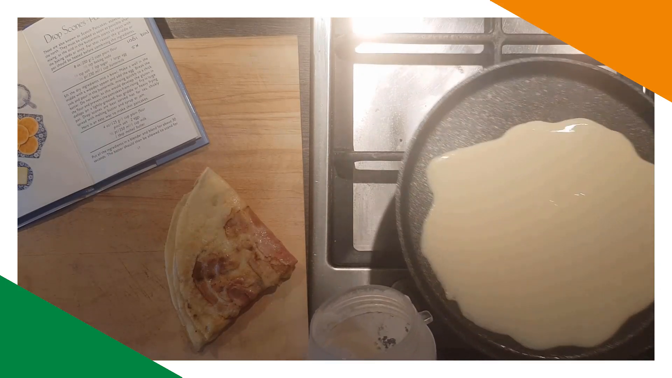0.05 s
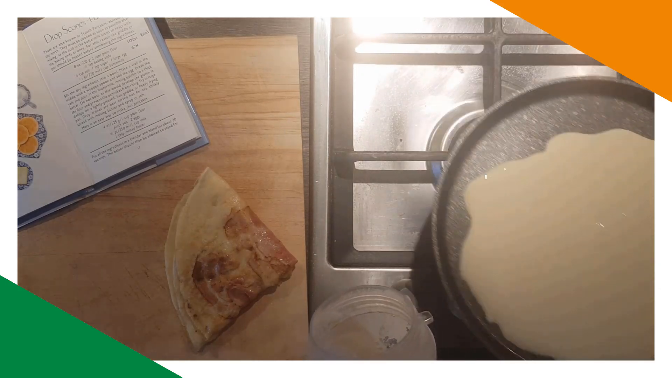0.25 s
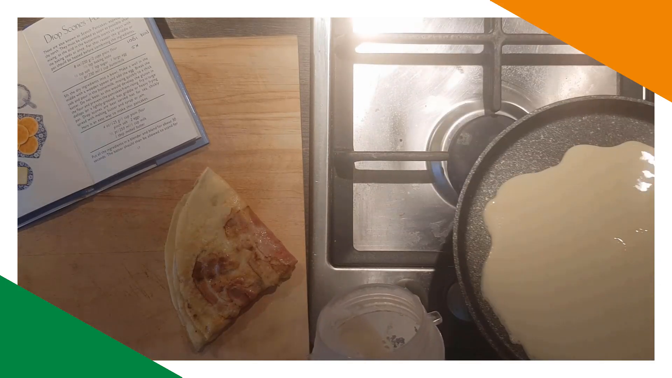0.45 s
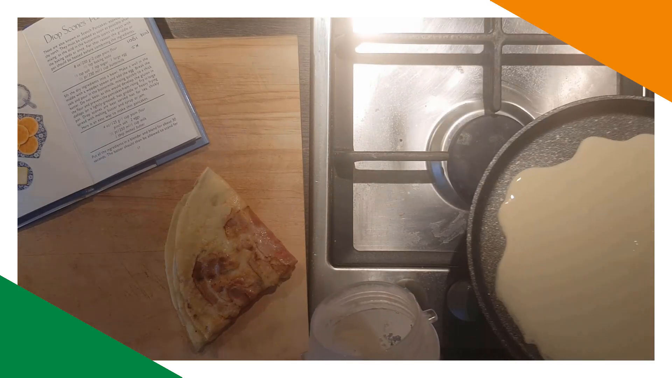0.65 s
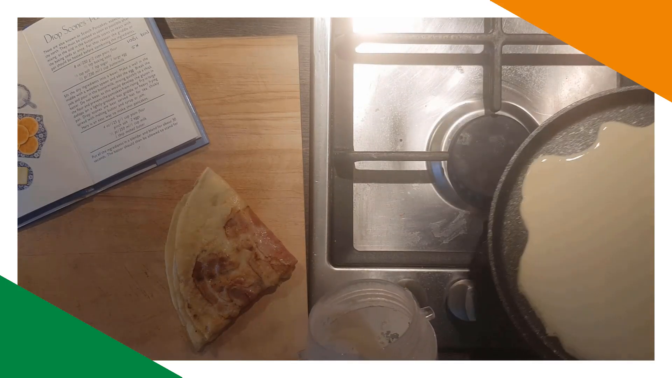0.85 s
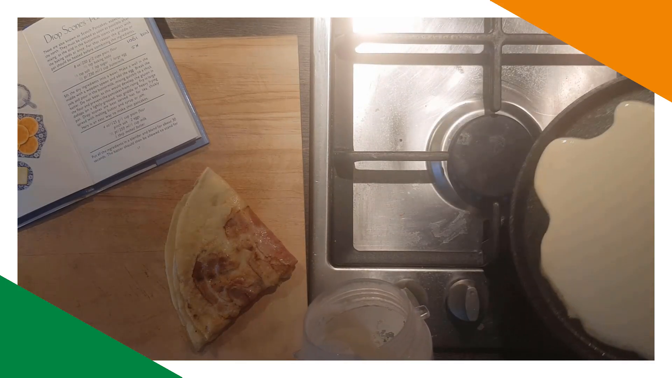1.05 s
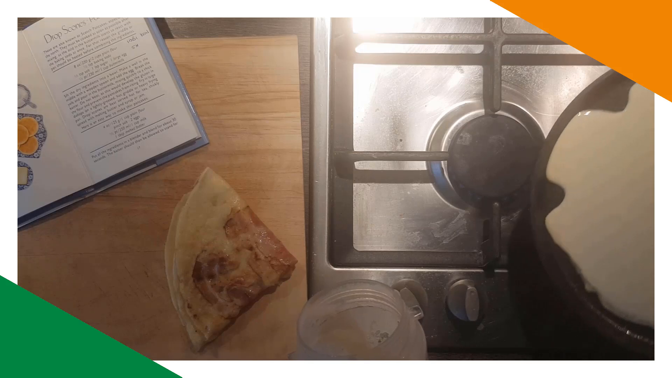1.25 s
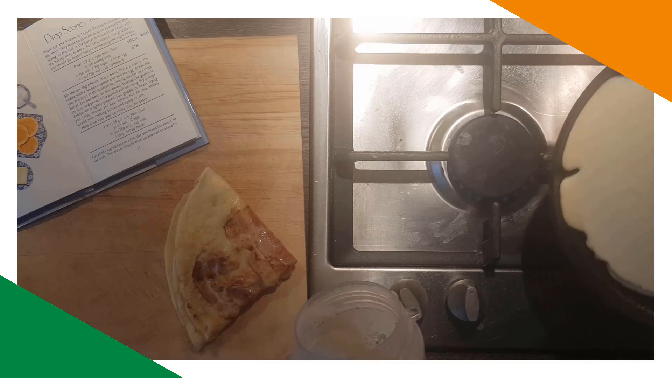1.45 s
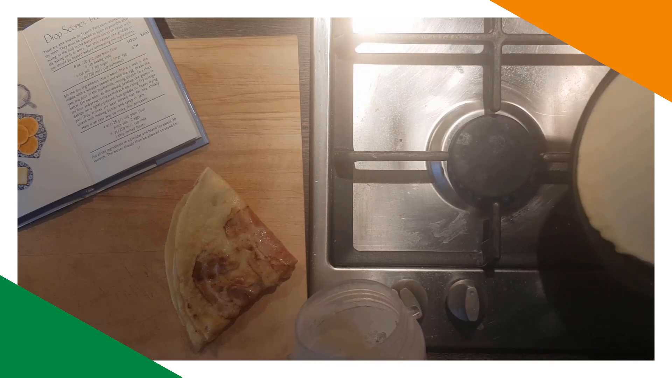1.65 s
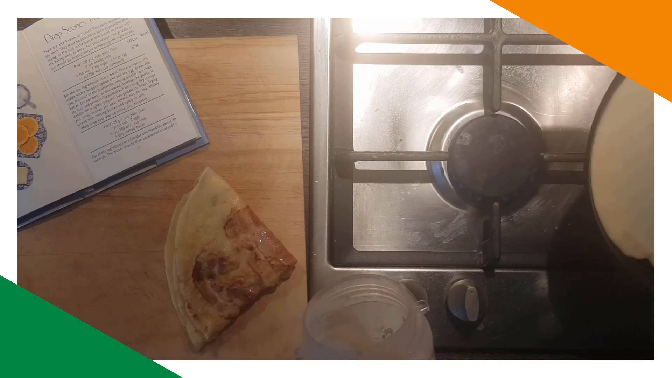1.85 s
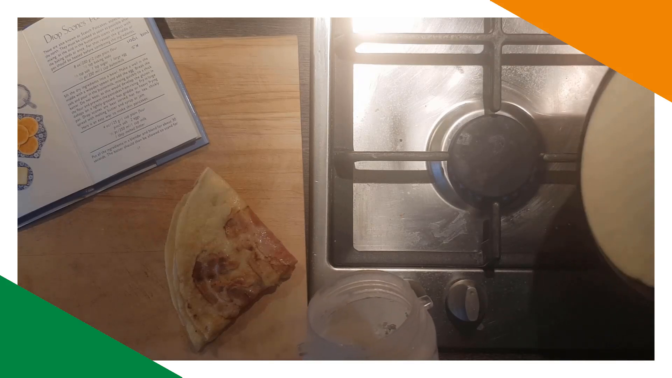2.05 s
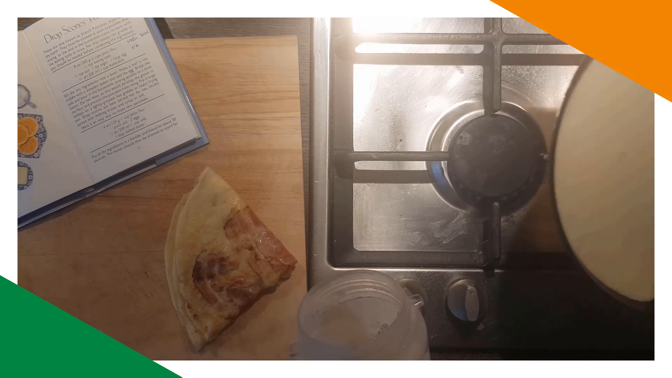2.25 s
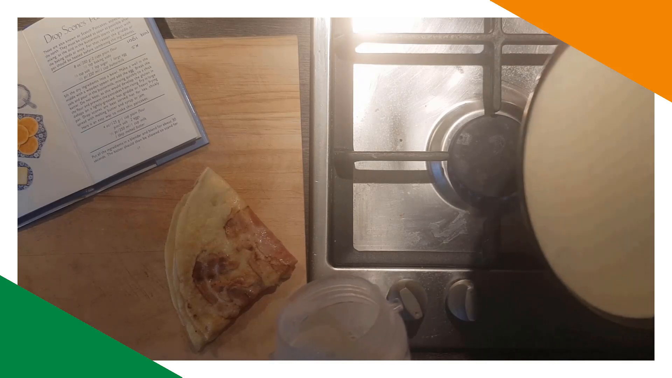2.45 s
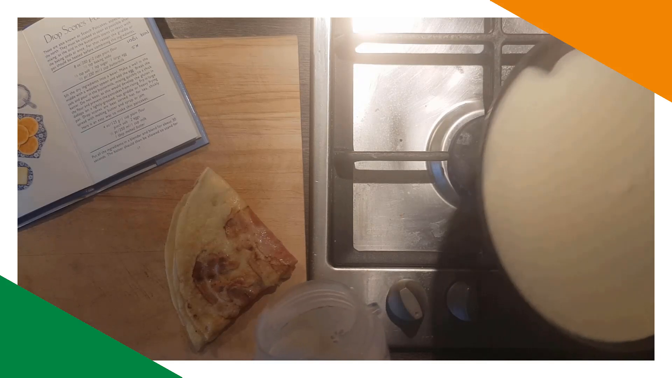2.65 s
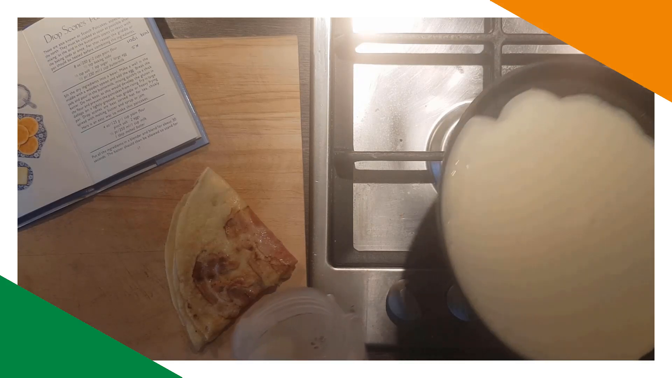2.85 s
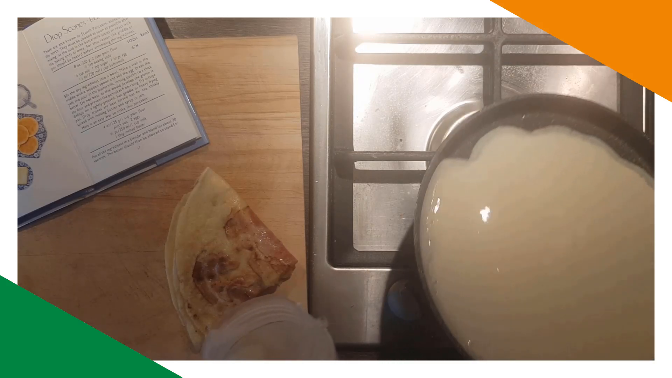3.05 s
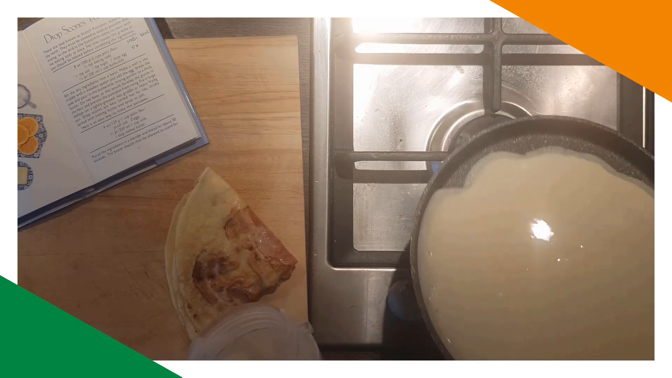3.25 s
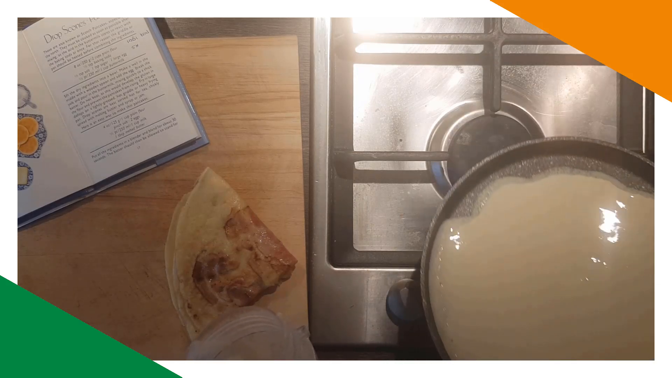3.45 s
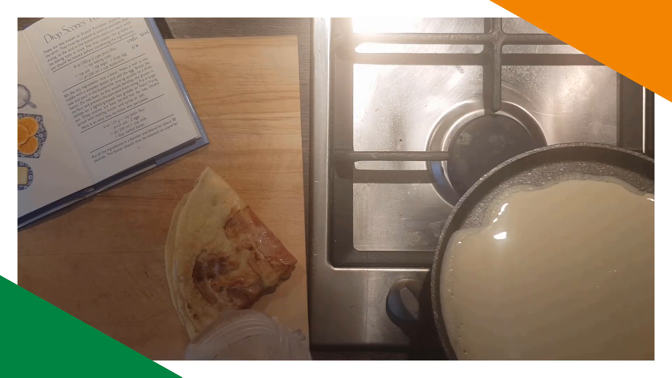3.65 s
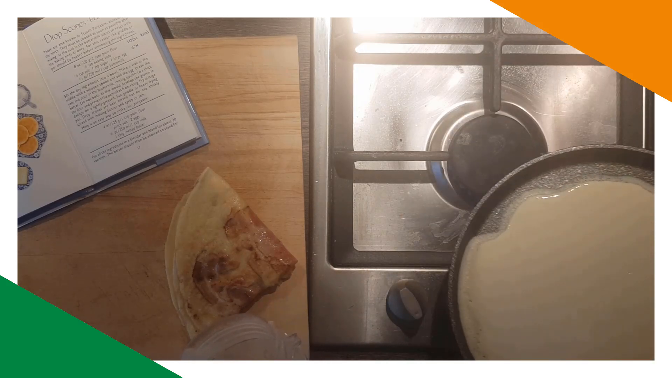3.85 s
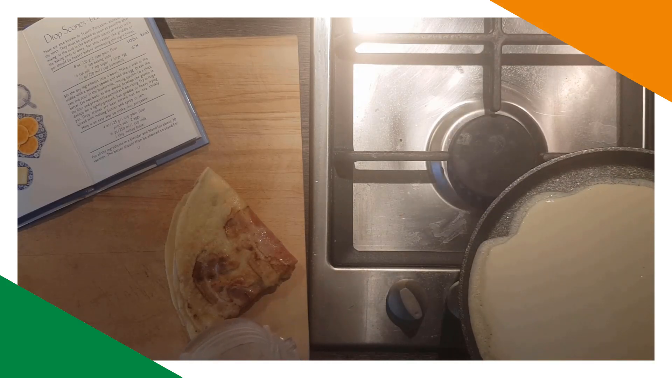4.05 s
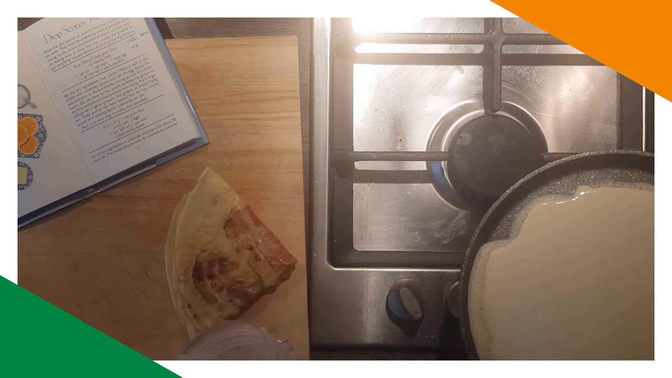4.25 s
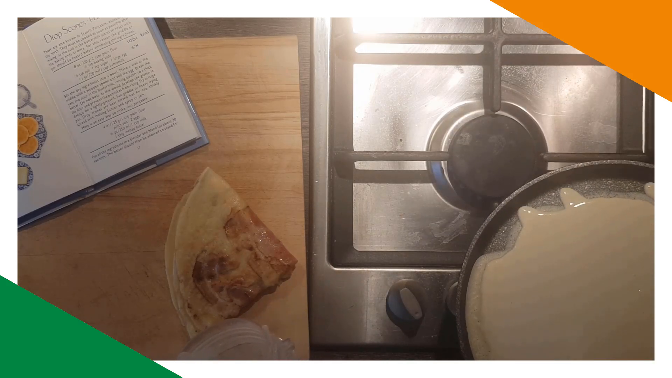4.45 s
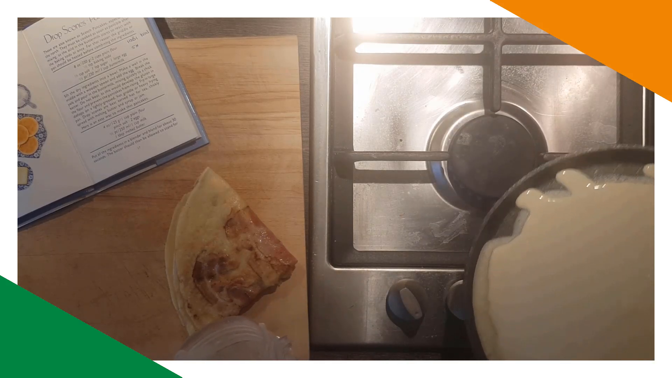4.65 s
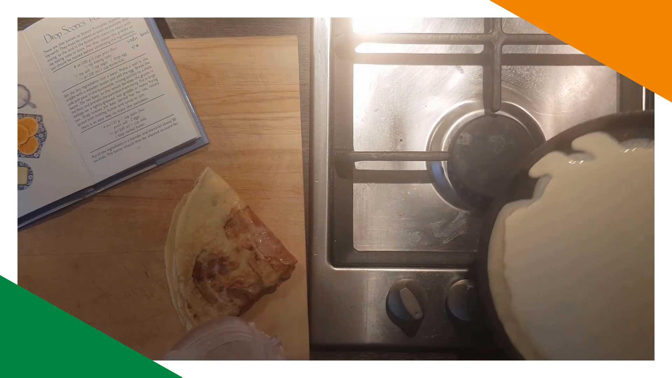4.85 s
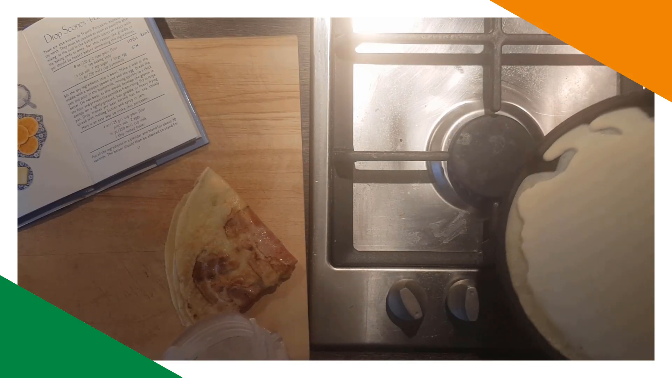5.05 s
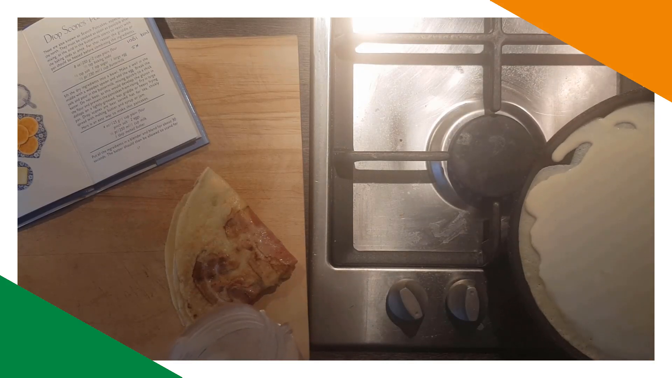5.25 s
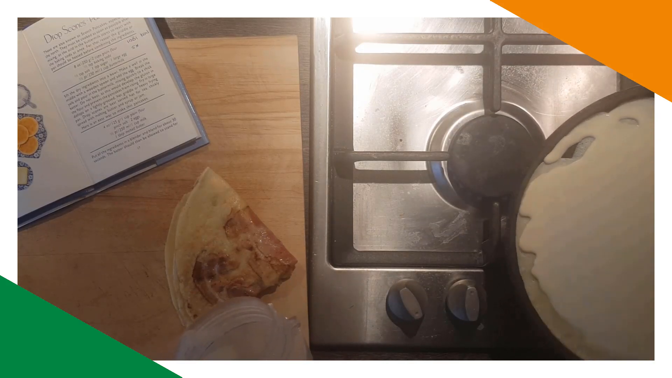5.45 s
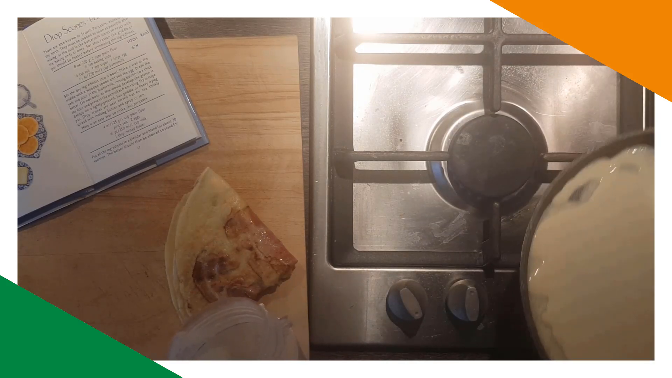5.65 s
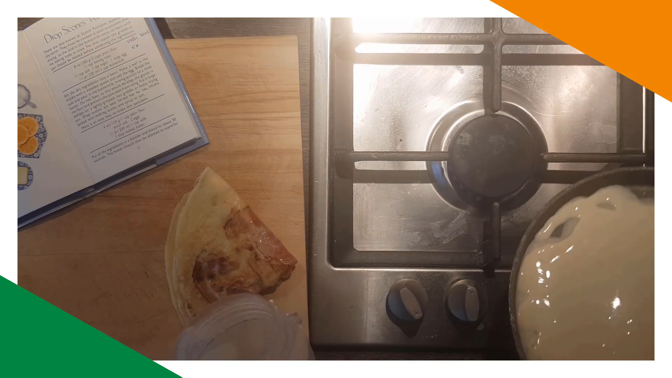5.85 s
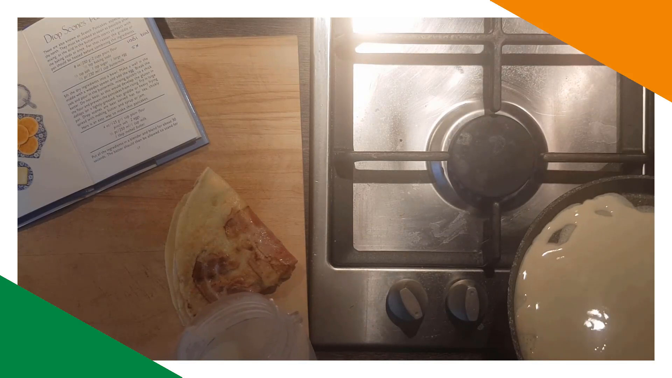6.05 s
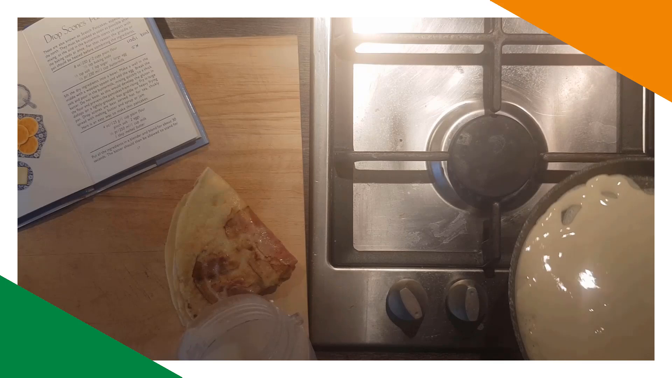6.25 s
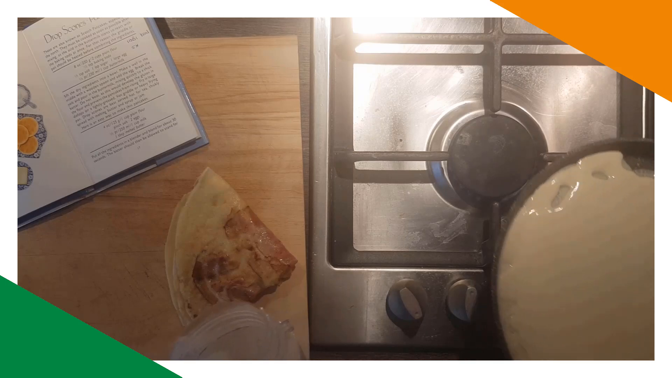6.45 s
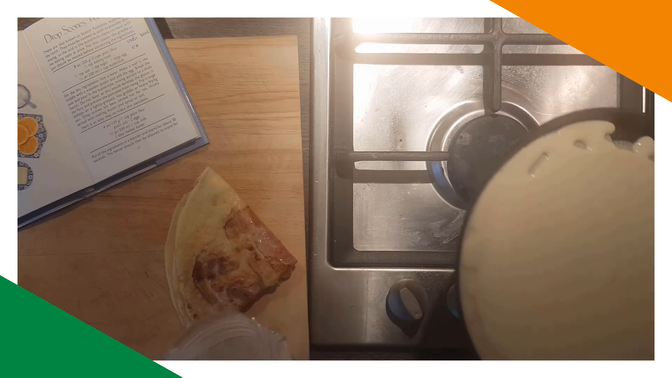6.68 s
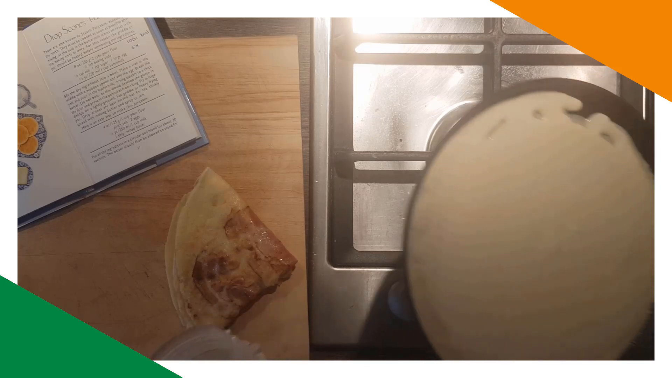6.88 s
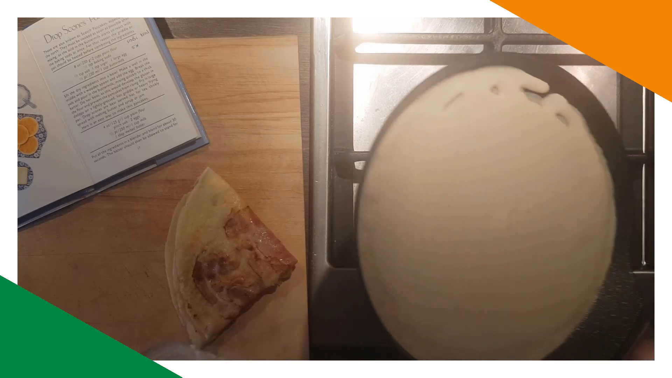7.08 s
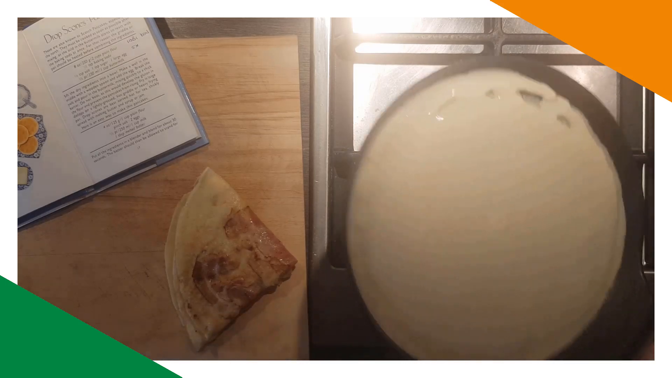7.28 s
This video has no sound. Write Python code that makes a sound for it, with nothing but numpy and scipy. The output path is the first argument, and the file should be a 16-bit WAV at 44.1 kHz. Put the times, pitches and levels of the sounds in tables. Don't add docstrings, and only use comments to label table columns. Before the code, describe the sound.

Bright close frying hiss with crackling pops flares for three seconds, then sinks to sparse sputters above quiet, dull mechanical patter and low rumble.

```python
import sys
import numpy as np
from scipy import signal
from scipy.fft import rfft, irfft, next_fast_len
from scipy.io import wavfile
from scipy.ndimage import uniform_filter1d

SR = 44100
rng = np.random.default_rng(int(sys.argv[2]) if len(sys.argv) > 2 else 0)


def store_wav(level_fs):
    pcm = np.round(np.clip(np.atleast_2d(level_fs), -1, 1) * 32767)
    wavfile.write(sys.argv[1], SR, pcm.T.astype(np.int16))


def amplitude_ratio(level_db):
    exponent = np.asarray(level_db, float) / 20
    return 10 ** exponent


N = 322812

# pitch_hz, density_db
ROOM_SPECTRUM = [(12, -29), (20, 3.5), (48, -3.5), (129, -4), (229, -11), (367, -9.5), (517, -19),
                 (586, -13), (742, -20.5), (1500, -22), (1950, -63), (3300, -120)]

# start_s, level_db
THUMP_TRAINS = [
    [(0.067, -45), (0.138, -48), (0.283, -45), (0.353, -48), (0.423, -45), (0.49, -42), (0.558, -49),
     (0.689, -50), (0.763, -47), (1.101, -46), (1.167, -50), (1.367, -45), (1.504, -49)],
    [(0.997, -51), (1.213, -48), (1.35, -48), (1.634, -46), (1.702, -46), (1.775, -43), (1.841, -44),
     (1.911, -50), (2.119, -45), (2.191, -47), (2.258, -46), (2.329, -44), (2.465, -47), (2.61, -45),
     (3.027, -49), (3.248, -45), (3.386, -50)],
    [(3.69, -46), (3.912, -49), (3.989, -48), (4.054, -53), (4.26, -51), (4.333, -49), (4.611, -53)],
    [(4.752, -49), (4.968, -47), (5.037, -45)],
    [(4.59, -53), (4.737, -47), (4.884, -51), (5.029, -47), (5.105, -48), (5.378, -47), (5.523, -46),
     (5.595, -52), (5.671, -47), (5.871, -47), (6.009, -47), (6.078, -53), (6.143, -49), (6.283, -46),
     (6.353, -50), (6.488, -50), (6.698, -48), (7.043, -48), (7.116, -46)],
    [(0.276, -45), (0.344, -52), (0.415, -46)],
    [(6.058, -47), (6.203, -48)],
    [(6.438, -51), (6.513, -46), (6.663, -50), (6.741, -46), (6.812, -46), (6.96, -46), (7.311, -48)],
    [(7.051, -48), (7.125, -46), (7.199, -52), (7.274, -45)],
]
# start_s, level_db
MAIN_THUMP_TRAIN = [(0.701, -49), (0.774, -50), (0.907, -47), (1.404, -46), (1.545, -49), (1.615, -44),
                    (1.755, -45), (1.824, -48), (1.892, -44), (2.297, -47), (2.717, -48), (2.786, -44),
                    (2.858, -47), (2.929, -44), (3.064, -52), (3.131, -45), (3.323, -45), (3.461, -45),
                    (3.66, -45), (3.73, -48), (3.804, -47), (4.02, -44), (4.301, -45), (4.366, -41),
                    (4.437, -47), (4.509, -45), (4.646, -45), (4.98, -45), (5.32, -45), (5.452, -47),
                    (5.643, -47), (5.911, -46), (5.979, -45), (6.193, -46), (6.461, -47), (6.532, -54),
                    (6.67, -47)]
# start_s, level_db
LONE_KNOCKS = [(.4, -51), (0.432, -47), (1.713, -48), (1.785, -52), (1.918, -50), (1.99, -47), (2.17, -52),
               (2.318, -49), (2.6, -45), (2.756, -50), (2.813, -43), (3.33, -48), (4.291, -50),
               (4.366, -56), (4.516, -49), (5.459, -53), (5.538, -52), (6.361, -49), (7.265, -43.5)]
# pitch_hz, level_db, t60_s, left_right_db
BODY_MODES = [
    (132, -5, 0.029, -4.5),
    (353.6, 1, 0.019, -0.5),
    (60, -20, 0.0081, 0),
]

# start_s, length_s, level_db
PAN_HUMS = [
    (1.596, 0.3, -60.5),
    (1.914, 0.086, -57.5),
    (2.045, 0.23, -63.5),
    (2.287, 0.19, -62),
]
# start_s, peak_db, pitch_hz
BUBBLE_POPS = [(0.015, -34, 2480), (0.0505, -37, 2060), (0.1336, -34, 2660), (0.2024, -29, 2750),
               (0.637, -37, 2560), (0.8001, -39, 2340), (0.8345, -37, 2780), (1.1837, -42, 2610),
               (1.2266, -35, 2710), (1.4147, -32, 2360), (1.4486, -39, 2760), (1.9225, -38, 2550),
               (1.9894, -37, 2780), (2.326, -27, 1920), (2.4199, -39, 2660), (2.4453, -36, 1860),
               (2.9347, -37, 2700), (3.3653, -45, 1740), (3.397, -40, 1320), (3.4994, -42, 1850),
               (3.6072, -44, 2220), (3.8467, -37, 2490), (3.8711, -36, 1980), (3.967, -42, 1660),
               (4.1574, -40, 1660), (4.2248, -40, 2630), (4.2632, -49, 1680), (4.437, -36, 1790),
               (4.574, -34, 2420), (4.6099, -49, 1830), (4.6324, -38, 1760), (4.7656, -46, 2680),
               (4.791, -36, 2410), (4.8229, -38, 1740), (5.1517, -50, 2270), (5.2994, -43, 1670),
               (5.5927, -42, 1600), (5.8411, -40, 1870), (6.8089, -50, 1790), (6.9346, -48, 1830)]

# time_s, vigour_db (fizz level), tilt_db (towards the microphones),
# fresh_db (fresh batter on bare metal)
SWIRL = [(0, -40.5, 4, -0.5), (.08, -40.5, -4, -1.5), (.9, -45, 4, -2.5), (1.3, -39.5, -16.5, 1.5),
         (1.87, -39.5, -22, 3.5), (2.06, -37.5, -13, 3), (2.44, -41, -2.5, 1.5), (2.75, -40, -0.5, -0.5),
         (3.26, -50, 7, 0.5), (3.55, -51, -0.5, -1.5), (4.4, -55, 1, -2.5), (4.77, -53.5, -9, 0.5),
         (5.28, -55.5, -6.5, 1.5), (5.38, -56.5, -6, 1.5), (5.85, -60, 1.5, 2.5), (5.95, -66, 5, 2),
         (6.25, -63, 3.5, 2), (7.32, -63, 5, -1)]
# pitch_hz, density_db
FIZZ_SPECTRUM = [(410, -21), (700, -17.5), (944, -12), (1010, -14), (1360, -5.5), (1550, -5), (2470, -4.5),
                 (2670, -5.5), (3800, -4.5), (5130, -2.5), (7770, -3), (8970, -1), (12900, -0.5),
                 (15100, -5), (15700, -6)]
# pitch_hz, left_right_db
FIZZ_LEAN = [(60, -5), (110, -5), (200, 5), (380, 1), (700, 1.5), (1290, 7), (2380, 4.5), (4400, 6.5),
             (8120, -1), (15000, 4.5)]
# pitch_hz, width_hz, boost_db
PAN_RESONANCES = [(975, 57, -7.5), (1030, 47, 8.5), (1145, 76, -1.5), (1260, 83, 1), (1520, 85, -2.5),
                  (1800, 81, 2), (2210, 100, 1.5), (2700, 140, 3), (3800, 610, -2), (5220, 270, 0.5),
                  (5650, 230, 3), (7800, 700, -3)]
# start_s, peak_db, brightness_db
FAT_SPITS = [(.221, -24, -14), (.2778, -30, -10), (2.158, -28, -4.5), (2.178, -31, -12), (2.328, -25, -12),
             (2.517, -24, -7), (2.6993, -35, -10), (2.5965, -29, -17), (2.659, -33, -10),
             (2.8125, -28, -12), (2.874, -30, -12), (2.881, -29, -10), (3.0135, -26.5, -9),
             (3.1547, -45, -13), (3.1906, -30, -11), (3.2316, -27.5, -12), (3.4446, -33, -18),
             (3.5623, -27.5, -12), (3.621, -37, -6), (3.681, -37, -5), (3.8205, -34.5, -6),
             (3.937, -37, -21), (4.1495, -39, -23), (4.2183, -44, -7), (4.518, -37, -15), (4.7391, -42, -1),
             (4.777, -39, -7), (4.8334, -38.5, -4), (4.9147, -37, -7), (5.0654, -35.5, -7),
             (5.2155, -37, -8), (5.2455, -41, -1), (5.3213, -38, -6), (5.5937, -41, -7), (5.613, -38, -7),
             (5.7746, -42, -2), (5.7505, -42, -7), (5.8511, -35, -8), (5.859, -42, -12), (5.951, -45, -14),
             (6.0108, -45, -15), (6.0267, -38.5, -19), (6.072, -36.5, -13), (6.0846, -36, -11),
             (6.4303, -44, -7), (6.8014, -40, -12), (7.045, -45, -6)]
# centre_s, half_length_s, pitch_hz, boost_db
STEAM_POCKETS = [(.58, 0.072, 1800, 4.5), (.85, 0.091, 2050, 2.5), (1.056, 0.19, 850, -14),
                 (1.31, 0.15, 4760, 2.5), (1.323, 0.12, 1980, 5.5), (1.61, 0.071, 1270, 3.5),
                 (1.7, 0.44, 4200, -0.5), (1.805, .13, 1260, 6), (1.853, 0.17, 2220, -4.5),
                 (2.023, 0.1, 1260, 5), (2.204, 0.15, 6240, 1.5), (2.278, 0.37, 3000, -2.5),
                 (2.347, 0.085, 4640, 1.5), (2.496, 0.057, 5250, 6), (2.546, 0.17, 2040, 4.5),
                 (2.6, 0.033, 5100, -2), (2.748, 0.4, 3380, -5), (2.85, 0.18, 720, -11),
                 (3.055, 0.094, 1800, 4.5), (3.5, 0.37, 3340, -3.5), (4.0, 0.14, 1740, 3.5),
                 (4.173, .08, 1600, 5.5), (4.44, 0.082, 1850, 4), (4.637, 0.086, 1800, 3),
                 (4.7, 0.44, 1120, -7), (4.78, .12, 5300, 2.5), (5.13, .12, 2200, 4), (5.237, 0.2, 5400, 5),
                 (5.3, .12, 1690, 3), (5.75, .15, 4800, 2.5), (5.78, 0.061, 1350, 2), (5.943, .08, 4900, 4),
                 (5.958, 0.089, 2600, 1.5), (6.2, 0.3, 1440, -14), (6.22, .15, 2700, -4),
                 (6.503, .12, 2800, 0), (6.7, 0.18, 1820, 6), (6.71, 0.11, 2850, 2.5), (6.72, .12, 920, 3),
                 (6.824, 0.053, 1800, 7.5), (6.942, .09, 1700, 6.5), (6.952, 0.076, 5700, 6.5),
                 (6.94, 0.07, 4700, 2), (5.6, 1.7, 1800, 3), (5.8, 1.2, 2480, -0.5), (5.2, 2.2, 3200, 1),
                 (2.213, 0.11, 12000, 3), (1.1, 0.31, 6000, 1), (3.7, 0.17, 4200, 1),
                 (7.1, 0.24, 1840, 3.5), (7.163, 0.11, 3050, -1.5), (7.176, 0.091, 4800, 3)]
# centre_s, half_length_s, pitch_hz, boost_db
RIM_GLINTS = [
    (2.345, .03, 5100, -1),
    (2.41, .03, 5100, 1.5),
    (2.595, .025, 5150, 5),
    (2.705, .025, 5200, 3.5),
    (3.01, 0.017, 5200, 4),
    (3.1, 0.11, 5250, 1),
    (3.0, 0.18, 6200, -0.5),
    (3.42, 0.14, 8500, -4),
]

# centre_s, pitch_hz, length_s
SILENT_BANDS = [(.17, 3790, .05), (.6, 3830, .06), (.96, 3880, .04), (1.03, 900, .1), (1.05, 790, .12),
                (1.14, 7580, .04), (1.25, 7710, .04), (1.32, 830, .07), (1.39, 3790, .05), (1.62, 860, .05),
                (1.9, 3800, .04), (2.28, 4090, .04), (2.35, 3270, .04), (2.39, 7500, .04),
                (2.58, 10770, .05), (2.75, 7750, .06), (2.75, 3320, .04), (2.77, 9600, .04),
                (2.81, 730, .05), (2.87, 7850, .09), (2.98, 7840, .05), (3.15, 600, .04), (3.18, 7450, .08),
                (3.38, 820, .05), (3.46, 7580, .04), (3.65, 11540, .05), (3.74, 7710, .04),
                (3.94, 7750, .04), (4.5, 990, .04), (4.64, 860, .04), (4.97, 900, .05), (4.99, 12450, .04),
                (5.09, 10030, .04), (5.67, 950, .05), (5.82, 950, .07), (5.97, 12750, .06),
                (6.02, 11280, .05), (6.15, 12450, .05), (6.32, 12580, .04), (6.61, 13000, .08),
                (6.98, 780, .05), (7.04, 7190, .06), (7.09, 11760, .04), (7.11, 820, .05),
                (7.25, 7970, .06), (5.6, 14000, .07), (6.55, 14200, .12), (6.75, 14400, .09),
                (6.9, 14000, .09), (7.0, 14000, .06), (7.14, 14000, .09), (7.24, 14000, .07),
                (6.24, 14100, .05), (6.13, 14100, .05), (6.4, 14100, .07)]
# low_hz, high_hz, from_s, to_s, number
SILENT_ZONES = [
    (650, 1150, .2, 7.2, 45),
    (800, 1200, 2.9, 6, 25),
    (3300, 4200, .1, 3.2, 25),
    (7200, 8300, 2.3, 7.2, 25),
    (9500, 13000, 2.5, 7.2, 20),
    (13500, 14500, 4, 7.2, 40),
    (13600, 14800, 6.4, 7.2, 25),
]


def rms_one(x):
    return x / np.sqrt(np.mean(x ** 2) + 1e-20)


def in_time(rows):
    s, *columns = np.transpose(rows)
    return [np.interp(np.arange(N) / SR, s, c) for c in columns]


def at_hz(points, hz):
    f, v = np.transpose(points)
    return np.interp(np.log(hz), np.log(np.maximum(f, 1)), v)


def sides(db):
    return amplitude_ratio(np.array([db / 2, -db / 2]))


def drift(rate):
    r = np.exp(-40 * np.pi * rate / SR)
    slow = signal.lfilter([1], [1, -2 * r, r * r], rng.standard_normal(N // 20 + 2002))[2000:]
    return np.interp(np.arange(N) / 20, np.arange(len(slow)), rms_one(slow))


def colour(x, spectrum_db):
    size = next_fast_len(N)
    hz = np.maximum(np.arange(size // 2 + 1) * SR / size, 1)
    return irfft(rfft(x, size) * amplitude_ratio(spectrum_db(hz)), size)[..., :N]


def evened(x, span_s):
    return x / np.sqrt(uniform_filter1d(np.mean(x ** 2, axis=0), int(span_s * SR)) + 1e-20)


def rumble():
    level_db, alike = -57.5, 0.66
    mid, side = rng.standard_normal((2, N))
    side = colour(np.sqrt(1 - alike) * side, lambda hz: at_hz([(350, 0.0), (550, 4.5)], hz))
    pair = np.sqrt(1 + alike) * mid + side * [[1], [-1]]
    lean = lambda hz: np.outer([.5, -.5], at_hz([(100, -4.0), (600, 4.0)], hz))
    return amplitude_ratio(level_db) * rms_one(colour(pair, lambda hz: at_hz(ROOM_SPECTRUM, hz) + lean(hz)))


def thumps(push_s, uneven_db):
    gap_s, gain_db = .0688, 0.5
    hits = np.zeros(N)
    for train in THUMP_TRAINS + [MAIN_THUMP_TRAIN]:
        knots, db = np.transpose(train)
        steps = np.cumsum(np.r_[0, np.round(np.diff(knots) / gap_s)])
        at = (np.interp(np.arange(steps[-1] + 1), steps, knots) * SR).astype(int)
        uneven = uneven_db * rng.standard_normal(len(at))
        hits[at] += amplitude_ratio(gain_db + np.interp(at / SR, knots, db) + uneven)
    for s, db in LONE_KNOCKS:
        hits[round(s * SR)] += amplitude_ratio(db)
    push = np.hanning(int(push_s * SR))
    pushes = np.convolve(hits, -2 * push / push.sum(), "same") + 1e-18
    out = 0
    for hz, db, t60, pan_db in BODY_MODES:
        r, w = amplitude_ratio(-60 / (t60 * SR)), 2 * np.pi * hz / SR
        mode = signal.lfilter([1, -r * np.cos(w)], [1, -2 * r * np.cos(w), r * r], pushes)
        out = out + amplitude_ratio(db) * sides(pan_db)[:, None] * mode
    return out


def pan_hum():
    pitch_hz, width_hz, edge_s, lag_cycles = 584, 6, 0.037, 0.12
    t = np.arange(N) / SR
    r, w = np.exp(-np.pi * width_hz / SR), 2 * np.pi * pitch_hz / SR
    tone = signal.lfilter([1, 0, -1], [1, -2 * r * np.cos(w), r * r], rng.standard_normal(N))
    held = 0
    for s, length, db in PAN_HUMS:
        held = held + amplitude_ratio(db) * np.clip(np.minimum(t - s, s + length - t) / edge_s + .5, 0, 1)
    pair = np.array([tone, np.roll(tone, int(lag_cycles * SR / pitch_hz))])
    return evened(pair, span_s=0.096) * held * sides(3.5)[:, None]


def pops():
    t60_s, gain_db = .02, -1.5
    out, t = np.zeros((2, N + 2000)), np.arange(2000) / SR
    for s, db, hz in BUBBLE_POPS:
        puff = rng.standard_normal((2, 2000)) * amplitude_ratio(-60 * t / t60_s)
        puff = signal.lfilter(*signal.iirpeak(hz, 2.5, SR), puff)
        i = int(s * SR)
        out[:, i:i + 2000] += amplitude_ratio(db + gain_db) * puff / np.abs(puff).max()
    return out[:, :N] * sides(3.7)[:, None]


def crackle(per_s, spread_db, clump_db, wander_db, path_t60, direct_db, count):
    clumps = clump_db * (drift(5.0) + 1.3 * drift(9.0) + 0.18 * drift(34.0))
    born = rng.random(N) < per_s * amplitude_ratio(clumps) / SR
    sizes = amplitude_ratio(spread_db * np.minimum(rng.exponential(1, N), 4))
    bursts = born * sizes * rng.choice([-1, 1], N)
    spot, t = rng.integers(0, count, N), np.arange(1500) / SR
    out = 0
    for k in range(count):
        paths = rng.standard_normal((2, 1500)) * amplitude_ratio(-60 * t / path_t60)
        direct = np.arange(1500) == rng.integers(0, 30, (2, 1))
        paths = paths / np.linalg.norm(paths, axis=1, keepdims=True) + amplitude_ratio(direct_db) * direct
        here = bursts * (spot == k) * amplitude_ratio(wander_db * drift(0.67))
        out = out + signal.oaconvolve(here[None], paths, axes=1)[:, :N]
    return rms_one(out)


def surges(per_s, surge_db, t60):
    kicks = (rng.random(N) < per_s / SR) * rng.exponential(1, N)
    gain = 1 + amplitude_ratio(surge_db) * signal.lfilter([1], [1, -amplitude_ratio(-60 / (t60 * SR))], kicks + 1e-18)
    return rms_one(gain)


def stray_spits(fizz_db):
    over_fizz_db, spread_db, bright_db = 12.5, 1.5, -31
    when, size, shade = rng.random((36, 3)).T
    db = fizz_db[(when * N).astype(int)] + over_fizz_db + spread_db * (2 * size - 1)
    return list(zip(when * N / SR, db, bright_db + 10 * (shade - .5)))


def spits(rows, level_db, bright):
    t60_s, rise_s = 0.037, 0.00067
    out = np.zeros(N)
    for s, db, bright_db in rows:
        i = int(s * SR)
        t = np.arange(min(3000, N - i)) / SR
        peak_db = db + level_db + bright * (bright_db + 11.0)
        out[i:i + len(t)] += amplitude_ratio(peak_db - 60 * t / t60_s) * np.minimum(t / rise_s + 0.6, 1)
    return out


def pockets(x):
    width = 0.2
    out = x.copy()
    for s, length, hz, db in STEAM_POCKETS + RIM_GLINTS:
        i, j = max(int((s - length) * SR), 0), min(int((s + length) * SR), N)
        b, a = signal.iirpeak(hz, 1 / width, SR)
        out[:, i:j] += (amplitude_ratio(db) - 1) * np.hanning(j - i) * signal.lfilter(b, a, x[:, i:j])
    return out


def sizzle():
    mid_db, tilt_db, fresh_db = in_time(SWIRL)

    def register_db(base, per_vigour, per_tilt, per_fresh):
        return base + per_vigour * (mid_db + 50) + per_tilt * tilt_db + per_fresh * fresh_db

    large_db = register_db(-1.54, -0.18, 0.16, -0.21)
    small_db = register_db(2.2, 0.047, 0.3, 1.06)
    ring_db = register_db(-12, 0.26, 1.42, 1)
    large_db = uniform_filter1d(mid_db + large_db, int(0.2 * SR)) - mid_db

    def shape(hz):
        rings = sum(db / (1 + (2 * (hz - at) / width) ** 2) for at, width, db in PAN_RESONANCES)
        lean = np.outer([.5, -.5], at_hz(FIZZ_LEAN, hz))
        return at_hz(FIZZ_SPECTRUM, np.minimum(hz, 15000)) + rings + lean

    edge = lambda hz, at: 1 / (1 + (hz / at) ** 12)
    large = lambda hz: edge(hz, 3590)
    middle = lambda hz: edge(hz, 6930) - edge(hz, 2920)
    small = lambda hz: 1 - edge(hz, 7440)
    rim = lambda hz: 1 / (1 + ((hz - 5060) / 620 * 2) ** 2) ** 2
    grains = crackle(per_s=9000, spread_db=1.7, clump_db=0.5, wander_db=5.0, path_t60=0.05, direct_db=-2.5, count=28)
    shared = surges(per_s=19, surge_db=-18.0, t60=0.19)
    puffs = rng.standard_normal((2, N))
    bursts = FAT_SPITS + stray_spits(mid_db)
    layers = [(large, large_db, -15.0, 0, .1), (middle, -1.5, -4.0, 0, .5),
              (small, small_db, -1.5, 1, 1.1), (rim, ring_db, -18, 0, 1.2)]
    out = 0
    for part, rel_db, spit_db, bright, flare in layers:
        band = lambda hz: shape(hz) + 10 * np.log10(np.maximum(part(hz), 1e-9))
        flares = (shared * surges(per_s=14, surge_db=-16.0, t60=0.081)) ** flare
        fizz = evened(colour(grains, band), span_s=0.23) * flares
        out = out + amplitude_ratio(mid_db + rel_db + 1.5) * fizz
        out = out + rms_one(colour(puffs, band)) * spits(bursts, spit_db - 6.5, bright)
    return pockets(out)


def scene():
    return rumble() + thumps(push_s=0.0031, uneven_db=0.76) + pan_hum() + pops() + sizzle()


def silent_bands(x):
    sliver_s, reach = .035, .6
    out = x.copy()
    slivers = []
    for low, high, start, end, count in SILENT_ZONES:
        for a, b, c in rng.random((count, 3)):
            slivers.append((start + (end - start) * a, low + (high - low) * b, sliver_s * (.5 + c)))
    for s, hz, length in SILENT_BANDS + slivers:
        i, j = int((s - reach * length) * SR), min(int((s + reach * length) * SR), N)
        half = (100 + .022 * hz) / 2
        sos = signal.butter(3, [hz - half, hz + half], "band", fs=SR, output="sos")
        band = signal.sosfiltfilt(sos, out[:, i:j].mean(axis=0))
        out[:, i:j] -= np.minimum(2 * np.hanning(j - i), 1) * band
    return out


def top_cut(x):
    return signal.sosfilt(signal.butter(12, 16610, fs=SR, output="sos"), x)


def record(dry):
    low_pass = signal.ellip(14, .5, 70, 15720, fs=SR, output="sos")
    cut = signal.sosfilt(low_pass, dry)
    mix = silent_bands(cut) - .0006
    return top_cut(mix)


dry = scene()
out = record(dry)
store_wav(out)
```